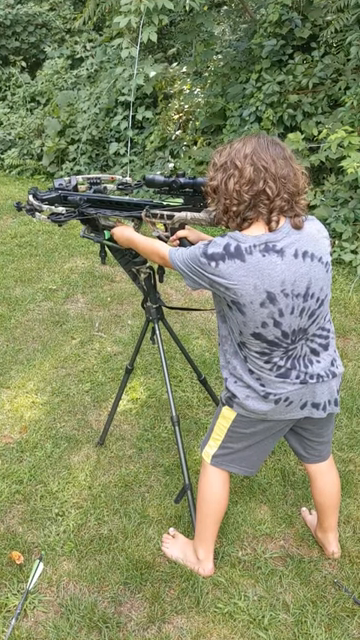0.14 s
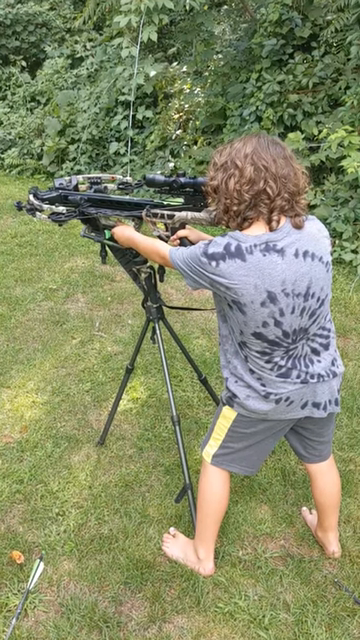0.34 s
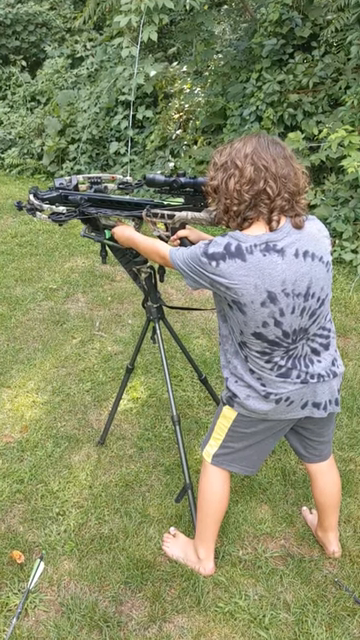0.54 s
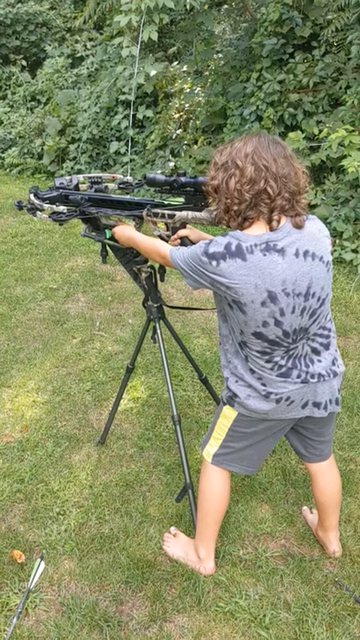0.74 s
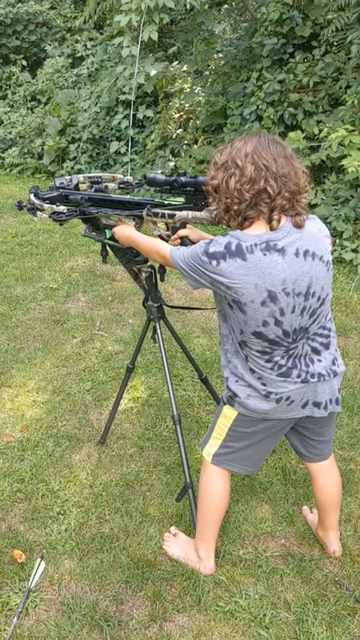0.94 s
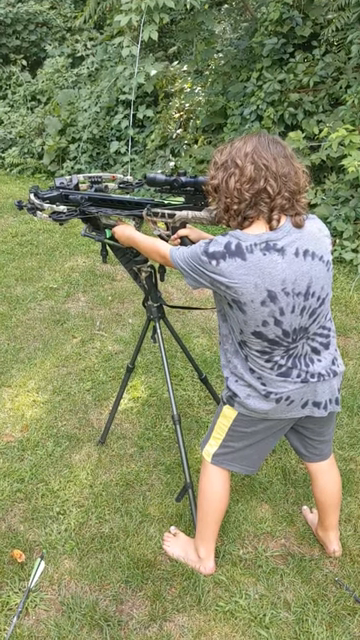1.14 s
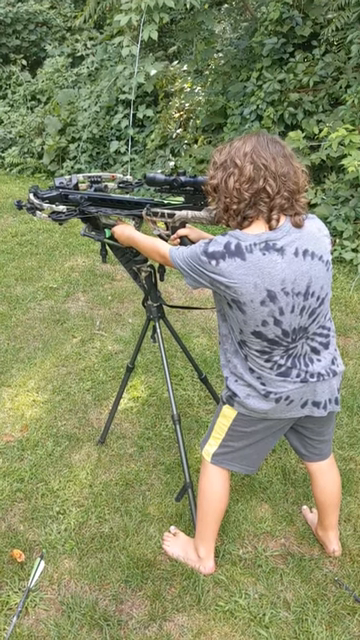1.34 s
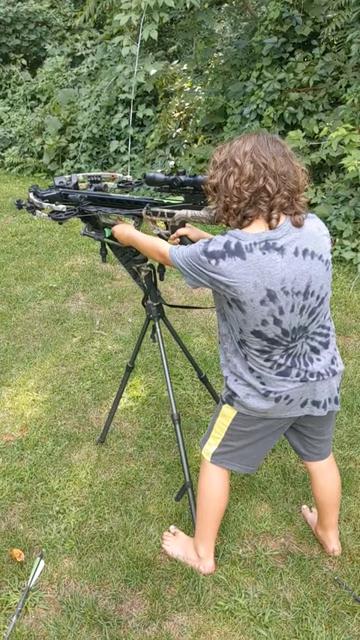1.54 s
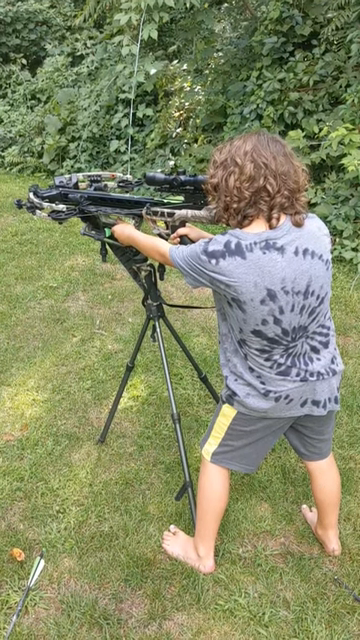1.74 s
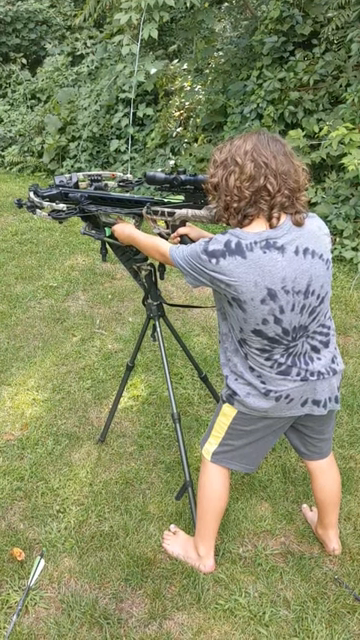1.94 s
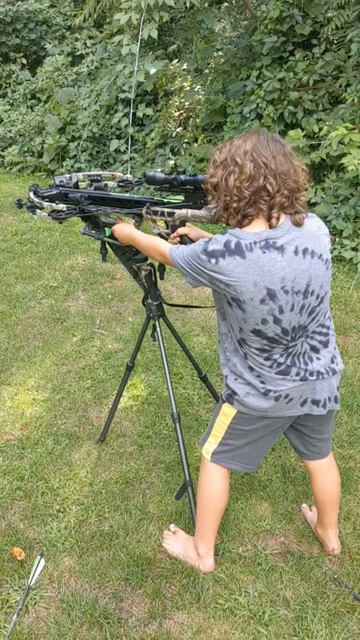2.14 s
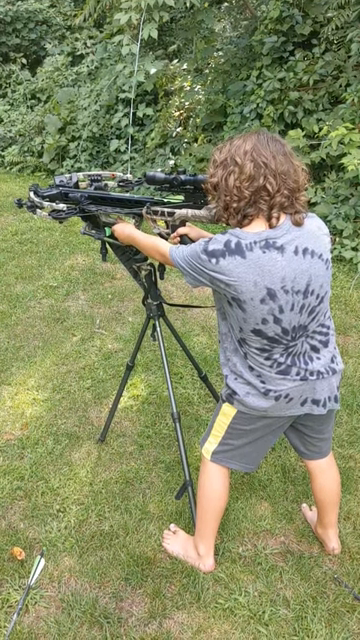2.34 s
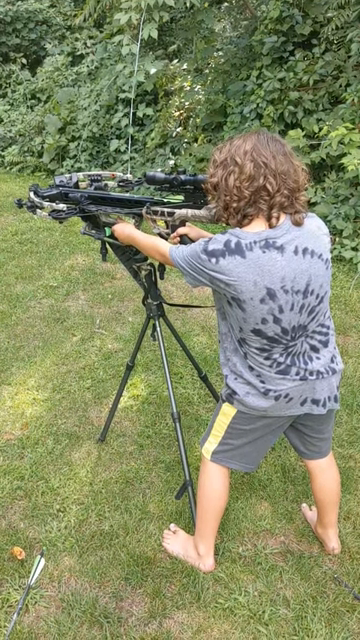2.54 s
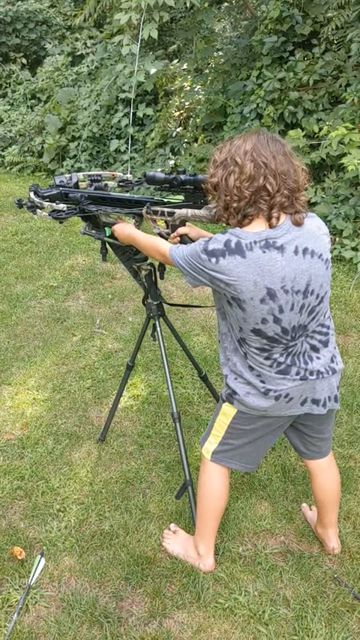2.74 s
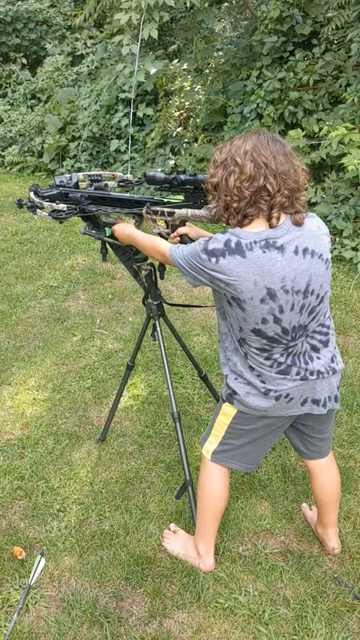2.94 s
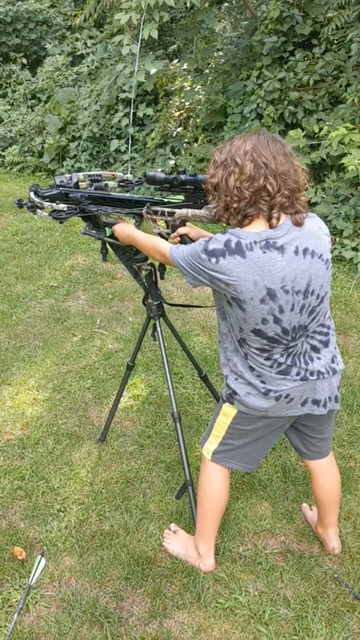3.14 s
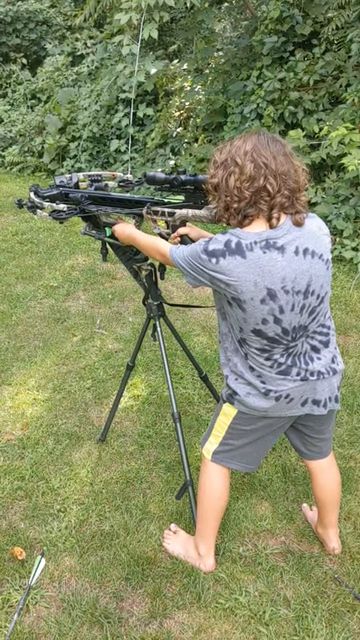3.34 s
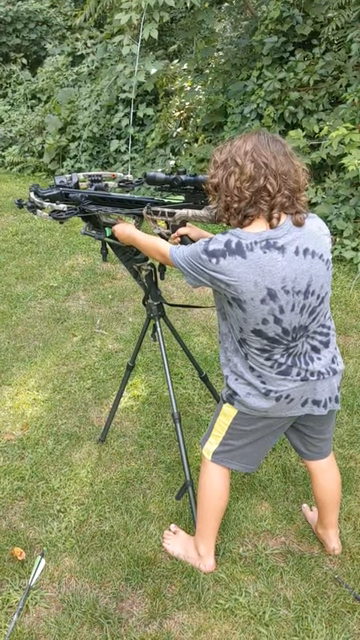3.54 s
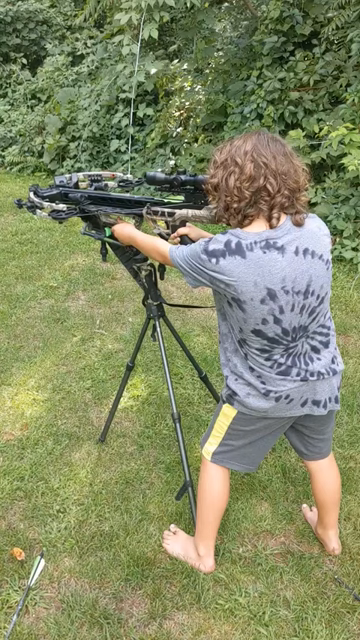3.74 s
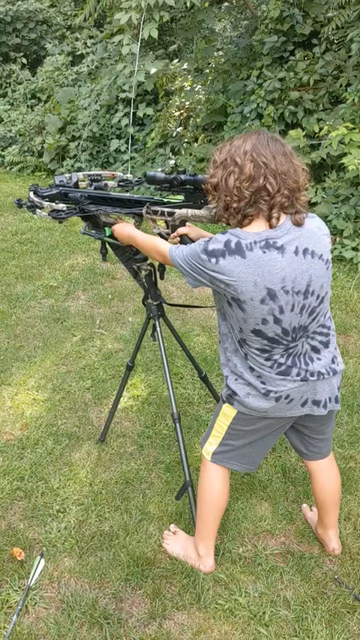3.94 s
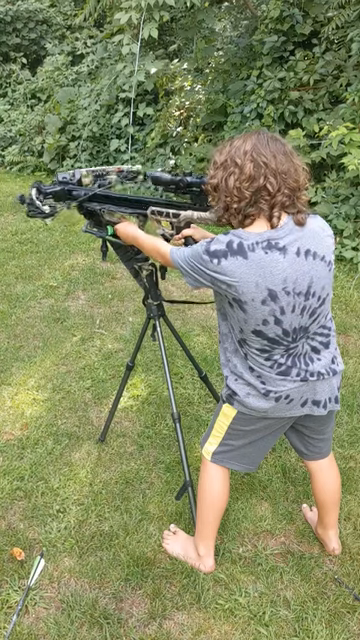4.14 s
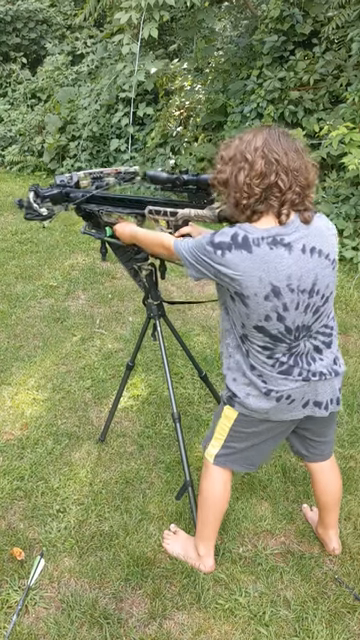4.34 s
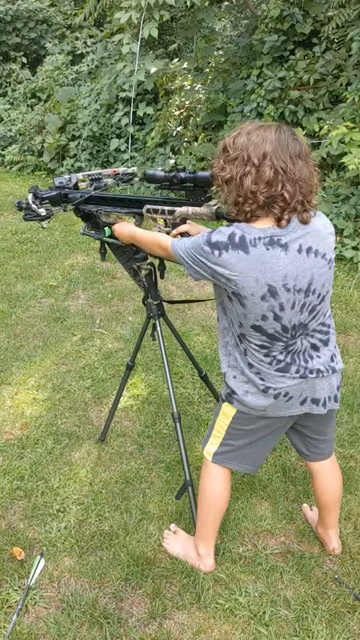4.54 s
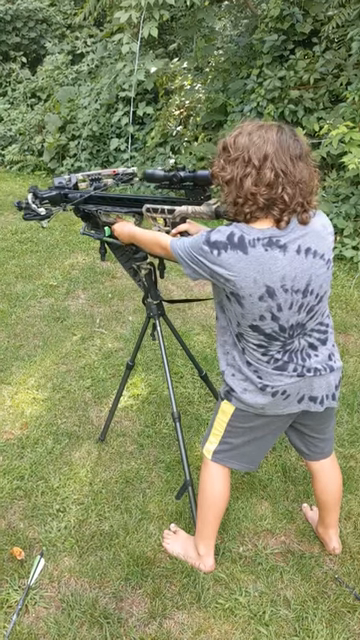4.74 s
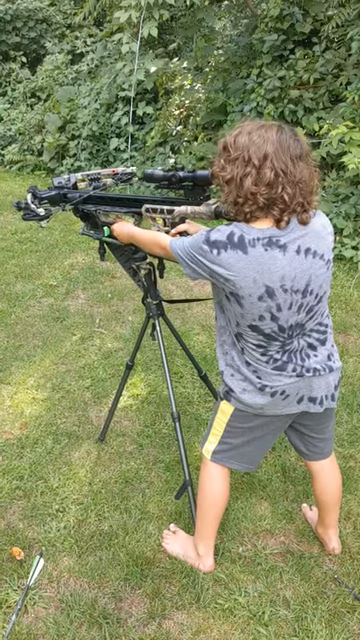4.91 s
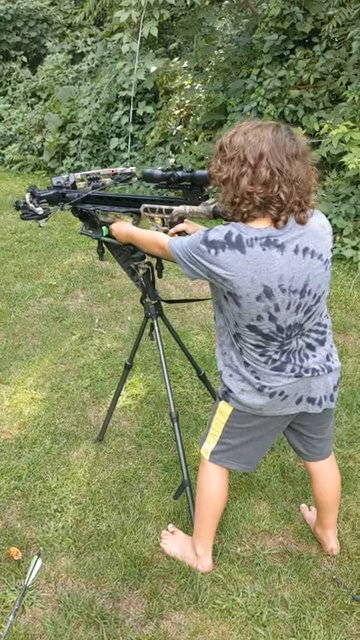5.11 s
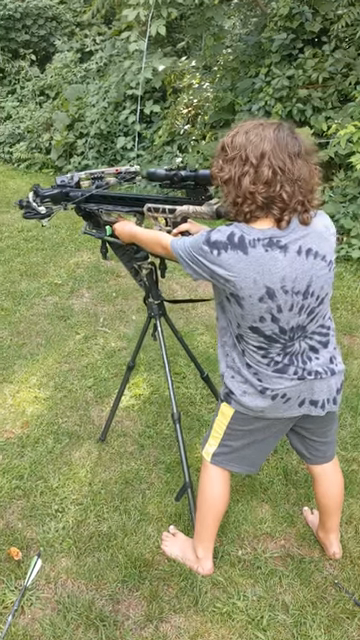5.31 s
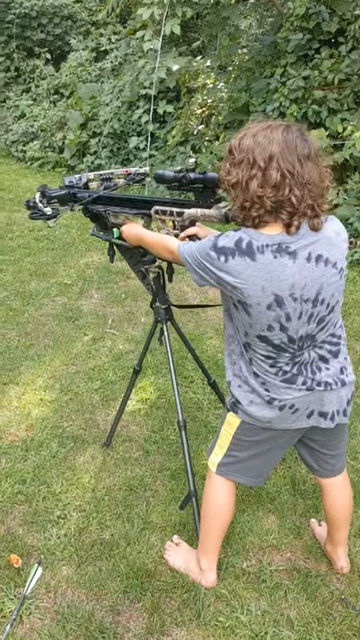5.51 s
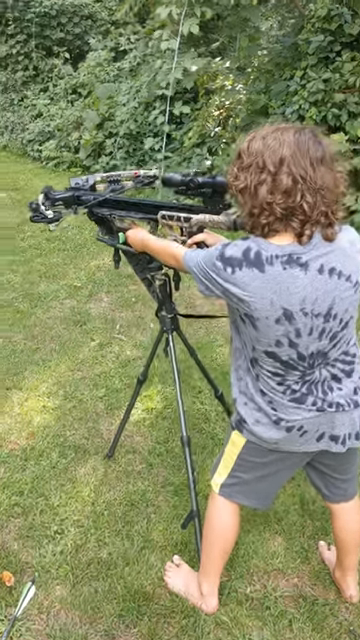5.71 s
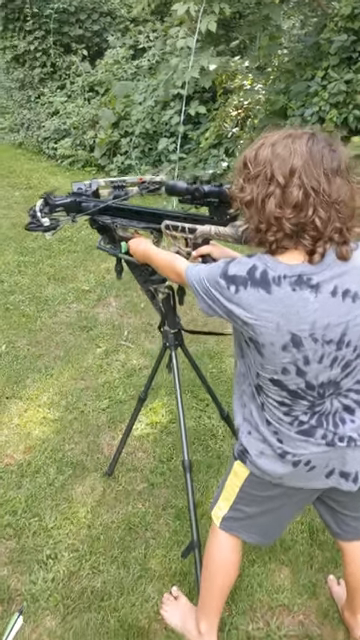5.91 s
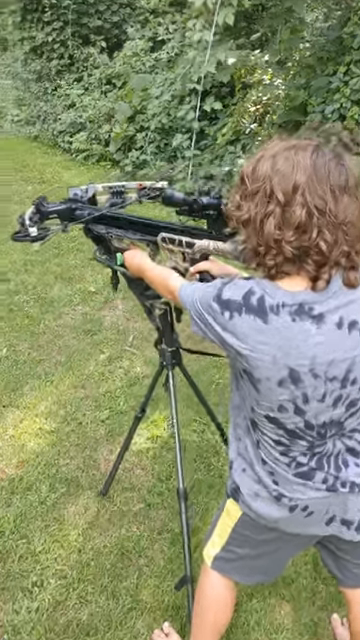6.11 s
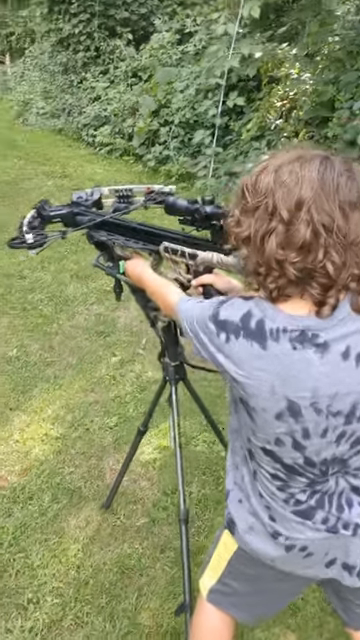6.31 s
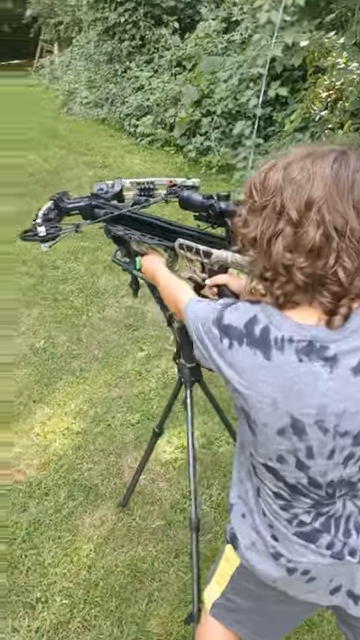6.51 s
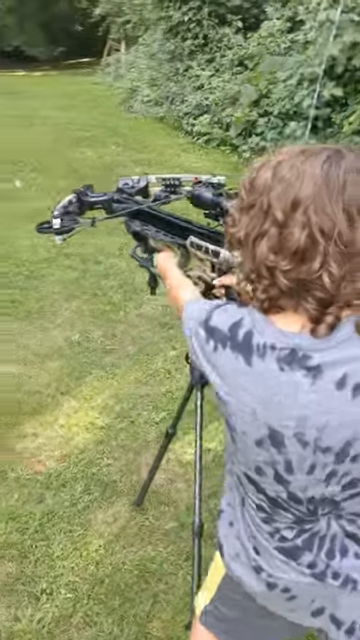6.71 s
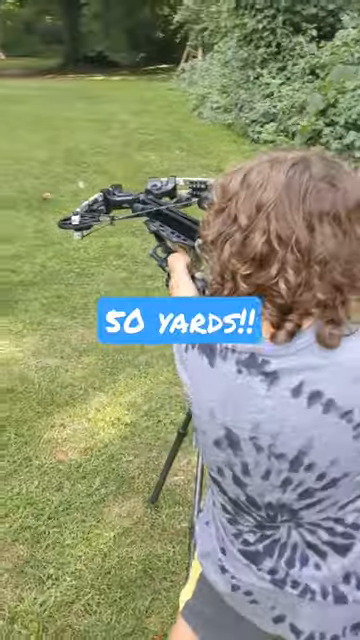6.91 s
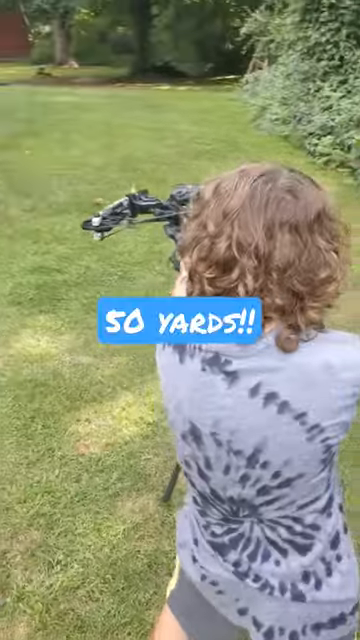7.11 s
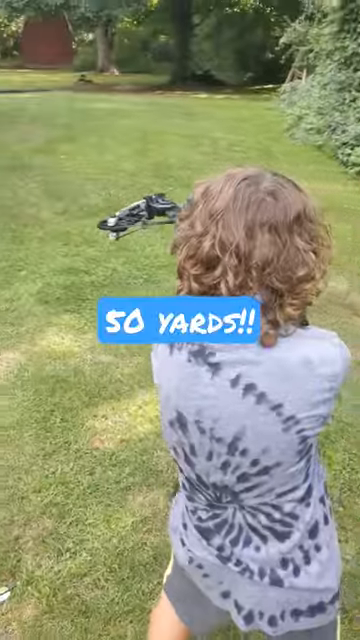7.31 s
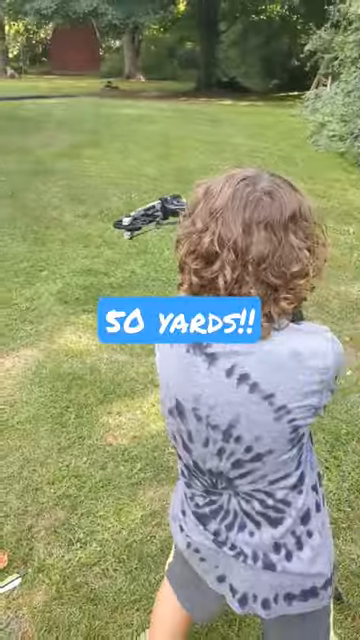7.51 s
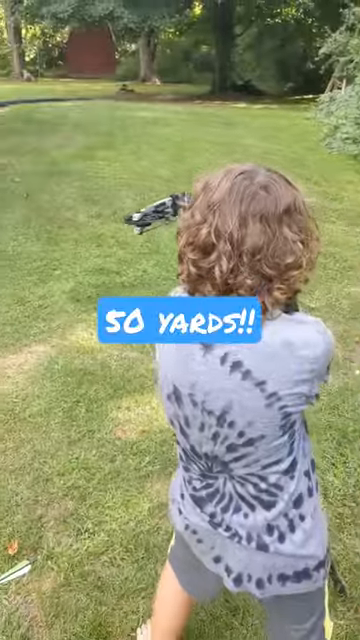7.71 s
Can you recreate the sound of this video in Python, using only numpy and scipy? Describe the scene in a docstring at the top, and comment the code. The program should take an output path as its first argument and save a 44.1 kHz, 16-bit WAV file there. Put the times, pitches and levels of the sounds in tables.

```python
"""A grassy yard with hedges and trees, where a crossbow on a tripod fires: the string zips along the rail as bright
noise, slams into its stops and rings the limbs, and the bolt thuds into a distant foam target made of decaying modes.
Surroundings throw both back as single returns and a noise wash. Crickets trill, chirp and blur into a noise chorus,
a far propeller engine drones in three sines, and soft tones glide over air and a breeze of filtered noise.
Feet shift in the grass as grainy noise bursts, and a sandal squeaks near the end by stick and slip."""
import sys
import numpy as np
from scipy import signal
from scipy.io import wavfile
from scipy.ndimage import uniform_filter1d

SR = 44100
rng = np.random.default_rng(int(sys.argv[2]) if len(sys.argv) > 2 else 0)


def dump(signal):
    """Clip the signal to [-1, 1] and save it as 16-bit WAV at the path in sys.argv[1]."""
    limited = np.clip(np.atleast_2d(signal).T, -1, 1)
    pcm = np.round(limited * 32767).astype(np.int16)
    wavfile.write(sys.argv[1], SR, pcm)


N = 346626
T = np.arange(N) / SR


def amp(db):
    """dB to gain."""
    return 10 ** (np.asarray(db) / 20)


def unit(x):
    """Scale to rms 1."""
    return x / np.sqrt(np.mean(x ** 2) + 1e-20)


def in_time(rows):
    """Columns of a curve, read sample by sample."""
    s, *columns = np.transpose(rows)
    return [np.interp(T, s, column) for column in columns]


def at_hz(points, hz):
    """Read a spectrum table on a log frequency axis."""
    table_hz, values = np.transpose(points)
    return np.interp(np.log(hz), np.log(table_hz), values)


def drift(rate_hz):
    """Smooth random wander of rms 1: noise through a double low-pass near rate_hz, run at 1/40 of the sample rate."""
    r = np.exp(-80 * np.pi * rate_hz / SR)
    noise = rng.standard_normal(N // 40 + 2002)
    slow = signal.lfilter([1], [1, -2 * r, r * r], noise)[2000:]   # skip the filter's start
    return np.interp(np.arange(N) / 40, np.arange(len(slow)), unit(slow))


def resonate(x, hz, width_hz):
    """Two-pole resonance, gain 1 on top."""
    r = np.exp(-np.pi * width_hz / SR)
    feedback = [1, -2 * r * np.cos(2 * np.pi * hz / SR), r * r]
    return signal.lfilter([(1 - r * r) / 2, 0, (r * r - 1) / 2], feedback, x)


def balance(pan_db):
    """Left and right gains that differ by pan_db, positive to the left."""
    return amp([[pan_db / 2], [-pan_db / 2]])


def place(x, pan_db, lag_s):
    """Two spaced ports: a level difference and the left one's delay."""
    return balance(pan_db) * np.array([np.interp(T - lag_s, T, x), x])


def strike(modes, blows):
    """Blows (s, dB, contact cut Hz) ring every mode (Hz, dB, t60 s); a softer contact has a lower cut."""
    blow_spread_db = 1.5   # no two blows land alike
    out, t = np.zeros(N), np.arange(SR // 5) / SR
    for s, db, cut_hz in blows:
        ring = 0
        for hz, mode_db, t60 in modes:
            level_db = mode_db + blow_spread_db * rng.standard_normal()
            tone = amp(level_db - 60 * t / t60) * np.sin(2 * np.pi * hz * t)
            ring = ring + tone / (1 + (hz / cut_hz) ** 4)
        out[round(s * SR):][:len(t)] -= amp(db) * ring
    return resonate(out, 1000, 9700)   # small bodies radiate little bass


def cracks(hits, t60, hz, width_hz):
    """Each hit (s, dB) sheds a short broad noise burst, unlike in the two ports."""
    starts = np.full(N, 1e-18)
    for s, db in hits:
        starts[round(s * SR)] += amp(db)
    fall = signal.lfilter([1], [1, -amp(-60 / (t60 * SR))], starts)
    return fall * unit(resonate(rng.standard_normal((2, N)), hz, width_hz))


def bands(spectrum, patchy_db, low_hz, size=N, cut_hz=None):
    """Half-octave bands of stereo noise, each with its own level, flicker and left-right likeness."""
    # How alike the ports hear a diffuse sound. Each row: frequency in Hz, left-right correlation from -1 to 1.
    likeness = [(60, 1), (240, 0.65), (950, 0.012), (3770, -0.023), (15000, 0.0013)]
    out, white = 0, rng.standard_normal((2, 2, size))
    edges = low_hz * 2 ** np.arange(0, np.log2(19000 / low_hz), .5)
    for k, (low, high) in enumerate(zip(edges, edges[1:])):
        band_pass = signal.butter(2, [low, high], "band", fs=SR, output="sos")
        mid, side = signal.sosfilt(band_pass, white[k % 2])   # neighbouring bands take separate noise
        hz = np.sqrt(low * high)
        alike = np.clip(at_hz(likeness, hz), -1, 1)
        gain = amp(at_hz(spectrum, hz) + patchy_db * drift(2.2)[:size])
        if cut_hz is not None:
            gain = gain / (1 + (hz / cut_hz) ** 4)
        out = out + gain * (np.sqrt(1 + alike) * mid + np.sqrt(1 - alike) * side * [[1], [-1]])
    return out


def air():
    """Air and far traffic: diffuse noise, strongest in the bass, under a slow level curve."""
    # Loudness of the bed. Each row: time in seconds, level in dB.
    bed_level = [(0, -61), (3.6, -62.5), (4.16, -60.5), (4.51, -57), (4.7, -57.5), (6.72, -60),
                 (7.2, -57.5), (7.86, -58)]
    # Colour of the bed. Each row: frequency in Hz, relative density in dB per Hz.
    bed_colour = [(25, -8), (60, 8), (130, 6), (195, 0), (263, 1.5), (624, -9.5), (1500, -16.5),
                  (4250, -19.5), (7500, -54.5), (9300, -37), (10700, -57), (14500, -32), (16000, -44)]
    return amp(in_time(bed_level)[0]) * unit(bands(bed_colour, patchy_db=0.48, low_hz=24.05))


def breeze(breeze_db=-69):
    """Lumpy low wind noise, its own at each port, swelling once."""
    gust_s, gust_spread_s, gust_db = 3.8, 0.92, 7.5
    low_band = signal.butter(2, [30, 90], "band", fs=SR, output="sos")
    gusts = signal.sosfilt(low_band, rng.standard_normal((2, N)))
    swell_db = gust_db * np.exp(-((T - gust_s) / gust_spread_s) ** 2)
    return amp(breeze_db + swell_db + 2.5 * drift(0.75)) * unit(gusts) * balance(-2)


def drone():
    """Far propeller engine: three orders of the firing rate, wavering on their way through moving air."""
    # Each order fading in and out on the wind. Each row: time in seconds, level in dB of orders 1, 2 and 3.
    order_levels = [(0, -68, -61.5, -94), (.55, -60.5, -67.5, -77.5), (.85, -73, -63.5, -79),
                    (1.55, -58.5, -72, -83), (2.0, -63.5, -63.5, -77.5), (2.48, -66.5, -59, -71.5),
                    (3.1, -63.5, -63, -79.5), (3.4, -53.5, -63.5, -71.5), (3.72, -62, -69, -68),
                    (3.95, -53.5, -69, -69), (4.3, -53.5, -67, -72), (4.42, -46, -60, -75),
                    (5.0, -43, -71.5, -78), (5.5, -46.5, -60.5, -81.5), (6.22, -46, -67, -78.5),
                    (6.4, -45, -61, -72.5), (6.8, -48, -64.5, -64.5), (7.62, -45.5, -59.5, -63.5),
                    (7.86, -49.5, -55.5, -66.5)]
    engine_hz, engine_sag_hz_per_s = 131.5, .5   # firing pitch, sinking as the engine passes
    turn = 2 * np.pi * np.cumsum(engine_hz - engine_sag_hz_per_s * T) / SR
    turn = turn + 0.13 * drift(30.4) + .3 * drift(2.7)
    tone = 0
    for order, db in enumerate(in_time(order_levels), start=1):
        waver_db = 1.2 * drift(42) + 0.68 * drift(2.6)
        tone = tone + np.sqrt(2) * amp(db + waver_db) * np.sin(order * turn)
    return place(tone, pan_db=-0.5, lag_s=.00005)


def chorus():
    """Massed far crickets: unsynchronised wings blur into noise inside narrow bands, faintly throbbing."""
    # Loudness of the mass. Each row: time in seconds, level in dB.
    chorus_level = [(0, -49.5), (1.5, -50), (3, -50), (4.2, -49.5), (5, -49.5), (6, -49.5), (7, -49.5),
                    (7.86, -49)]
    # Bands of wing pitch. Each row: centre in Hz, width in Hz, relative level in dB, left-right difference in dB.
    wing_bands = [(4910, 550, -22.5, -5), (5410, 610, -16.5, -3.5), (6477, 320, -6.5, -1),
                  (6660, 60, -8, -0.5), (6920, 270, -2.5, -2), (7352, 210, -6, -2.5),
                  (7740, 260, -19.5, -2), (8214, 230, -28, 9.5), (10890, 950, -31.5, -2),
                  (13460, 1600, -29, -4)]
    out = 0
    for hz, width_hz, db, pan_db in wing_bands:
        band = resonate(resonate(rng.standard_normal((2, N)), hz, width_hz), hz, width_hz)
        out = out + amp(db + 0.17 * drift(22.4)) * unit(band) * balance(pan_db)
    return amp(in_time(chorus_level)[0] + 0.23 * drift(2.5)) * unit(out)


def trill():
    """Near trilling cricket: one short tone for every wing stroke, a fundamental with its overtone."""
    # Pace of the wings. Each row: time in seconds, wing strokes per second.
    trill_pace = [(0, 41.14), (1.8, 41.14), (2.1, 41.2), (5.1, 41.245), (5.5, 41.45), (7.86, 41.42)]
    # Gaps in the trill. Each row: start in seconds, length in seconds.
    trill_pauses = [(1.765, 0.11), (1.935, 0.11)]
    overtone_hz, overtone_db = 13530, -76   # stands clear of the chorus
    low_db = 10   # fundamental, dB above the overtone
    strokes = np.cumsum(in_time(trill_pace)[0]) / SR - .13
    stroke = (.5 + .5 * np.cos(2 * np.pi * strokes)) ** 2
    stroke = stroke * (1 - sum((T > s) & (T < s + length_s) for s, length_s in trill_pauses))
    turn = np.pi * overtone_hz * T + 0.31 * drift(40)   # phase of the fundamental, an octave below
    tone = np.sin(2 * turn) + amp(low_db) * np.sin(turn)
    level = amp(overtone_db + 1.5 * drift(0.56) + 1.2 * drift(17))
    return place(level * stroke * tone, pan_db=-17, lag_s=0)


def chirps(stroke_s=0.038, length_s=0.021):
    """Chirping cricket: three strokes a chirp, each falling in pitch, echoed by the leaves and roughened."""
    # Each row: start of the chirp in seconds, level of its strokes in dB.
    chirp_times = [(.268, -54), (.655, -55), (1.008, -55), (1.385, -54.5), (1.748, -55), (2.131, -54),
                   (2.545, -56), (2.870, -55), (3.239, -56), (3.656, -56), (4.09, -58), (5.139, -54.5),
                   (5.543, -56), (5.923, -54), (6.291, -53), (6.634, -56), (7.030, -54.5), (7.421, -56),
                   (7.80, -57)]
    # Leaves around the cricket. Each row: delay in seconds, level in dB.
    leaf_echoes = [(.014, -8), (.029, -10), (.047, -11), (.075, -11), (.11, -13)]
    start_hz, spread_hz, fall_hz_per_s = 5800, 30, 27000   # pitch as a stroke begins, its spread, its fall
    out, t = np.zeros(N), np.arange(int(length_s * SR)) / SR
    for s, db in chirp_times:
        hz = start_hz + spread_hz * rng.standard_normal()
        stroke = np.sin(np.pi * t / length_s) * np.sin(2 * np.pi * (hz * t - fall_hz_per_s / 2 * t ** 2))
        for k in range(3):
            part = out[round((s + k * stroke_s) * SR):][:len(t)]
            part += amp(db + 1.5 * rng.standard_normal()) * stroke[:len(part)]
    out = out + sum(amp(db) * np.interp(T - delay_s, T, out) for delay_s, db in leaf_echoes)
    rough = 1 + .13 * np.array([drift(260), drift(280)])
    return rough * place(out, pan_db=-7.0, lag_s=0.00025)


def gliding_tones():
    """Soft sines that glide in pitch, swell and die away, their level quivering."""
    # Each row: start in seconds, length in seconds, first and last pitch in Hz, level in dB.
    glides = [(0.16, 0.26, 1010, 968, -70.5), (0.54, 0.16, 178, 200, -56), (0.88, 0.11, 177, 194.6, -57)]
    out = np.zeros(N)
    for s, length_s, first_hz, last_hz, db in glides:
        x = np.arange(int(length_s * SR)) / (length_s * SR)
        turn = 2 * np.pi * np.cumsum(first_hz + (last_hz - first_hz) * x) / SR
        out[round(s * SR):][:len(x)] += amp(db) * np.sin(np.pi * x) ** 2 * np.sin(turn)
    return out * amp(3 * drift(20) + 3 * drift(70))


def rustles(grains_per_s=3000):
    """Feet and cloth in the grass: blades and stalks crackle under a short push, as grainy band noise."""
    # Each row: start in seconds, level in dB, t60 in seconds, centre in Hz, left-right difference in dB.
    pushes = [(0.50, -67.5, 0.69, 895, 1), (1.08, -72, .25, 1800, -3), (1.54, -70.5, 0.43, 1270, 0),
              (3.125, -66.5, .4, 900, 0), (3.128, -68.5, 0.33, 2260, 0), (3.185, -70.5, .3, 2000, 0),
              (3.926, -55.5, 0.44, 740, 0), (3.927, -63.5, 0.35, 2000, -2), (4.175, -65.5, 0.33, 1310, 0),
              (5.445, -69, .042, 1460, -16), (5.636, -59, 0.028, 2670, 8), (5.599, -73, 0.34, 9300, 0),
              (5.79, -70, 0.38, 9900, 0), (5.901, -61.5, 0.38, 1200, 1), (5.95, -64, 0.23, 800, 1.5),
              (6.055, -70, .2, 2000, 2), (6.362, -56.5, 0.085, 1680, 2.5), (6.9, -62, 0.63, 2080, -1),
              (6.905, -60.5, 0.67, 900, 4), (7.12, -67, 0.45, 2300, 3), (7.178, -61, 0.33, 2280, 2),
              (7.184, -57.5, 0.25, 4600, 3), (7.23, -66.5, 0.35, 900, 4), (7.33, -74, 0.95, 9990, 0),
              (7.44, -64, 0.67, 2150, 3), (7.469, -72, 0.53, 10500, 2), (7.65, -65.5, 0.48, 2000, 4)]
    rise_share = 0.061   # rise time over t60
    base_width_hz, width_share = 370, 0.23   # band width: a base plus a share of the centre
    out, t = np.zeros((2, N)), np.arange(SR // 2) / SR
    for s, db, t60, hz, pan_db in pushes:
        rise_s, width_hz = rise_share * t60, base_width_hz + width_share * hz
        snaps = rng.random(len(t)) < grains_per_s / SR
        grains = rng.standard_normal((2, len(t))) * (1.0 + snaps * 2.0)
        push = np.minimum(t / rise_s, 1) * amp(db - 60 * np.maximum(t - rise_s, 0) / t60)
        crackle = unit(resonate(resonate(grains, hz, width_hz), hz, 2 * width_hz))
        part = out[:, round(s * SR):][:, :len(t)]
        part += (push * crackle * balance(pan_db))[:, :part.shape[1]]
    return out


def squeaks():
    """Sandal sole: stick and slip at a gliding, uneven rate, rung through the sole's resonances."""
    # Each row: start in seconds, length in seconds, first and last slips per second, level in dB,
    # unevenness from 0 to 1, sharpness from 0 (sine) to 1 (sawtooth).
    sole_slips = [(6.906, 0.031, 1100, 1112, -46.5, 0.17, 1), (6.935, 0.028, 1125, 1097, -48.5, .17, 1),
                  (6.972, 0.029, 1084, 1046, -53, .17, 1), (7.012, 0.021, 1085, 1090, -55, 0.18, 1),
                  (7.117, 0.018, 594, 1120, -49, .05, 0.51), (7.156, 0.017, 950, 950, -51, .3, .6),
                  (7.178, 0.0214, 847, 1102, -37.5, 0.11, .5), (7.184, .043, 389.4, 1137, -35, 0.1, 0.73),
                  (7.226, 0.021, 1070, 1150, -50, .3, 1), (7.289, 0.0054, 497, 493, -57, .69, 0.73),
                  (7.495, .02, 2040, 2000, -60, .05, .6), (7.665, .03, 2300, 2650, -64, .1, .6),
                  (7.697, .045, 2320, 2380, -61, .06, .6)]
    # Resonances of the sole. Each row: frequency in Hz, width in Hz, gain in dB.
    sole_modes = [(475, 180, 3), (1084, 200, 9), (2230, 200, 10.5), (2600, 350, -4)]
    scuff_gain = 1.7   # noise grit per unevenness
    slips = np.zeros(N)
    for s, length_s, first_hz, last_hz, db, uneven, sharp in sole_slips:
        x = np.arange(int(length_s * SR)) / (length_s * SR)
        wobble = uniform_filter1d(rng.standard_normal(SR // 5), size=40)[:len(x)] * 6
        rate_hz = (first_hz + (last_hz - first_hz) * x) * (1 + uneven * wobble)
        turn = np.cumsum(rate_hz) / SR
        saw = sharp * (turn % 1 - .5)
        sine = (1 - sharp) * np.sin(2 * np.pi * turn) / np.pi
        scuff = uneven * scuff_gain * rng.standard_normal(len(x))
        slips[round(s * SR):][:len(x)] += amp(db) * np.sqrt(np.sin(np.pi * x)) * (saw - sine + scuff)
    sole = 0
    for k, (hz, width_hz, db) in enumerate(sole_modes):
        sole = sole + (-1) ** k * amp(db) * resonate(slips + 1e-18, hz, width_hz)
    return place(sole, pan_db=6.0, lag_s=-0.00037)


def echoes():
    """Hedge and trees: leaves scatter each bang into a grainy noise wash that dulls as it travels."""
    # Echoes of the shot, then of the bolt. Each row: first arrival in seconds, swell in seconds,
    # peak level in dB, t60 in seconds.
    shot_echoes = [(4.274, 0.0029, -27.5, 0.23), (4.31, 0.066, -44, 0.9), (4.39, 0.023, -51, 0.21),
                   (4.5, 0.032, -67, 0.6)]
    bolt_echoes = [(4.8, .0093, -42, 0.12), (4.825, 0.0088, -49, 0.13), (4.845, 0.01, -43.5, 0.31),
                   (4.9, 0.052, -56, 1.5)]
    # Colour of the wash. Each row: frequency in Hz, relative density in dB per Hz.
    wash_colour = [(120, -44), (200, -23.5), (254, -6), (347, -6.5), (424, -12), (465, -14), (867, -6.5),
                   (1750, -6.5), (2270, -6), (2850, -7.5), (7540, -6.5), (14600, -18), (16000, -40)]
    span_s, clump_db = .8, 1.8   # leafy echoes arrive in clumps
    out, t = np.zeros((2, N)), np.arange(int(span_s * SR)) / SR
    # opening treble cut in Hz, dulling in octaves per s
    for rows, cut_hz, dulling in ((shot_echoes, 11600, .9), (bolt_echoes, 2020, 0.53)):
        start = round(rows[0][0] * SR)
        span, now = slice(start, start + len(t)), start / SR + t
        level = 0
        for s, swell_s, db, t60 in rows:
            swell = np.clip((now - s) / swell_s, 0, 1) ** 2
            level = level + swell * amp(db - 60 * np.maximum(now - s - swell_s, 0) / t60)
        falling_cut_hz = cut_hz * 2 ** (-dulling * t)
        wash = bands(wash_colour, patchy_db=1.2, low_hz=181.6, size=len(t), cut_hz=falling_cut_hz)
        fade_out = np.minimum((span_s - t) * 10, 1)
        out[:, span] += level * fade_out * amp(clump_db * drift(93)[span]) * unit(wash)
    return out


def target():
    """Distant target: the bolt tip cracks the skin, the foam answers dull, trunks send it back."""
    # Tip piercing the skin, then the block rocking. Each row: time in seconds, blow level in dB,
    # contact cut in Hz, crack level in dB.
    bolt_hits = [(4.794, -36, 3000, -33.5), (4.7976, -26, 1510, -51), (4.8027, -24, 900, -44),
                 (4.8081, -34.5, 2500, -49)]
    # Modes of the foam block. Each row: frequency in Hz, level in dB, t60 in seconds.
    foam_modes = [(91, -2, 0.062), (196, 7.5, 0.034), (334, 7, 0.024), (413, 7, 0.062), (608, -7.5, 0.073),
                  (816, -21, 0.045), (1144, -5, 0.039), (1430, -9, 0.066), (1800, -8, 0.038),
                  (2160, -3, 0.042)]
    # Trunks return the thud thin. Each row: time in seconds, blow level in dB, cut in Hz.
    thud_returns = [(4.831, -35, 2000), (4.849, -34, 1500), (4.855, -40, 2000), (4.86, -34, 2000),
                    (4.869, -39, 1500), (4.884, -36, 2000), (4.899, -36, 1500), (4.919, -40, 2000),
                    (4.955, -48, 2000), (5.012, -47, 1800)]
    thin_hz = 650   # trunks are too slim to return the bass
    crack_hits = [(s, crack_db) for s, db, cut_hz, crack_db in bolt_hits]
    crack = cracks(crack_hits, t60=0.013, hz=4400, width_hz=1200)
    thud = place(strike(foam_modes, [row[:3] for row in bolt_hits]), pan_db=1.5, lag_s=0.00023)
    high_pass = signal.butter(4, thin_hz, "high", fs=SR, output="sos")
    returns = signal.sosfilt(high_pass, strike(foam_modes, thud_returns) + 1e-18)
    return crack * balance(-5) + thud + place(returns, pan_db=2.0, lag_s=0.00016)


def string_zip(end_s):
    """String zipping along the rail: bright whistling noise that rises fast, then fades until the first slam."""
    start_s, rise_s = 4.2575, 0.005   # the fade lasts as long as the rise
    top_db, rise_db, fall_db = -16, 28, 12.5
    x = (T - start_s) / rise_s
    db = top_db - rise_db * np.clip(1 - x, 0, 1) - fall_db * np.clip(x - 1, 0, 1) + 2.5 * drift(300)
    sounding = (x > 0) & (T < end_s)
    hiss = rng.standard_normal((2, N))
    whistle = unit(resonate(resonate(hiss, 5500, 1800), 5500, 1800))
    whistle = whistle + 0.76 * unit(resonate(hiss, 2200, 4000))
    return unit(whistle) * amp(db) * sounding * balance(-5)


def crossbow():
    """Bright zip, then slams that crack and ring the modes of limbs and stock, with single dull returns."""
    # String and limbs slamming on the stops. Each row: time in seconds, blow level in dB, crack level in dB.
    slams = [(4.2677, -10.5, -15.5), (4.2683, -20.5, -22.5), (4.2704, -16, -19), (4.2733, -21.5, -19),
             (4.276, -19.5, -21)]
    # Modes of limbs and stock. Each row: frequency in Hz, level in dB, t60 in seconds.
    bow_modes = [(70, -28.5, .12), (291, 8.5, 0.064), (336.6, -5, 0.042), (552, 2, 0.047),
                 (860, -16, 0.023), (942, 5, 0.022), (1034, 0.5, 0.012), (1190, 3.5, 0.017),
                 (683, -9, .025), (1755, -4, 0.036), (1870, -22, .04), (2280, -7.5, 0.1), (3380, -13, 0.04),
                 (3880, -29, 0.046), (5400, -12, 0.023), (6600, -10, 0.025), (8500, -12.5, 0.021)]
    # Hard walls and trunks return the slam whole but dull. Each row: time in seconds, blow level in dB, cut in Hz.
    slapbacks = [(4.293, -36, 4000), (4.323, -37, 1500), (4.365, -45, 3000), (4.399, -39.5, 2500),
                 (4.408, -39, 2970), (4.418, -46, 1500), (4.433, -51, 5000), (4.481, -49, 1500),
                 (4.502, -50, 2500), (4.561, -34, 695)]
    crack_hits = [(s, crack_db) for s, db, crack_db in slams]
    crack = cracks(crack_hits, t60=0.013, hz=4000, width_hz=5300)
    limbs = strike(bow_modes, [(s, db, 12000) for s, db, crack_db in slams] + slapbacks)
    bass = signal.sosfilt(signal.butter(1, 500, fs=SR, output="sos"), limbs)
    # the bass leans further left than the rest
    body = place(limbs, pan_db=2.5, lag_s=0.00022) + bass * [[.3], [-.3]]
    return string_zip(end_s=slams[0][0]) + crack * balance(-2.4) - body


def scene():
    """All sources in the yard."""
    background = air() + breeze() + drone() + chorus() + trill() + chirps() + gliding_tones()
    return background + rustles() + squeaks() + echoes() + target() + crossbow()


def record(dry, limit_db=-16, release_db_s=85):
    """Bass roll-off, a gain control that ducks on bangs and recovers, rounded peaks, cut top."""
    x = signal.sosfilt(signal.butter(2, 55, "high", fs=SR, output="sos"), dry)
    over_db = np.maximum(20 * np.log10(np.abs(x).max(axis=0) + 1e-9) - limit_db, 0)
    held_db = np.maximum.accumulate(over_db + release_db_s * T) - release_db_s * T
    r = np.exp(-1 / (0.06 * SR))   # 60 ms smoothing
    x = x * amp(-.5 * signal.lfilter([1 - r], [1, -r], held_db))   # takes off half the excess
    rounded = 1.163 * np.tanh(x / 0.85)
    return signal.sosfilt(signal.cheby2(12, 70, 16800, fs=SR, output="sos"), rounded)


dry = scene()
out = record(dry)
dump(out)
```